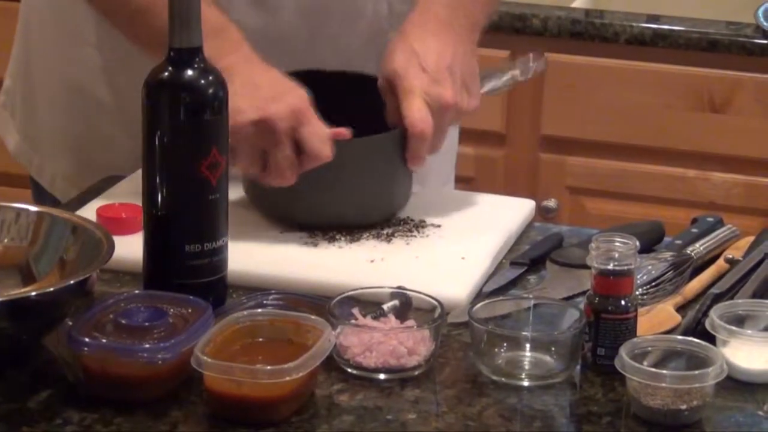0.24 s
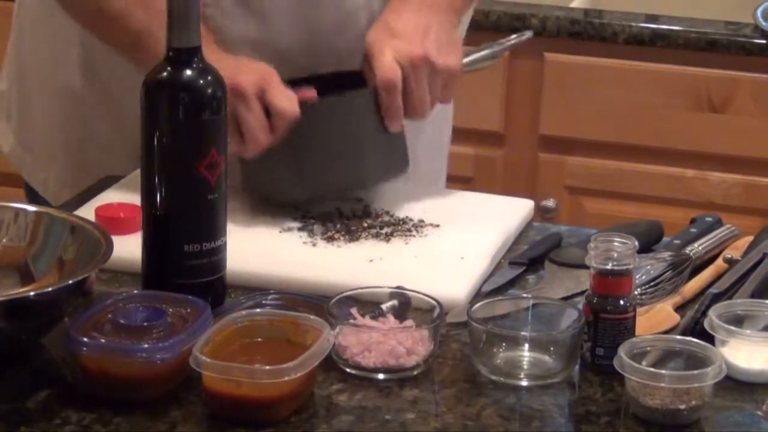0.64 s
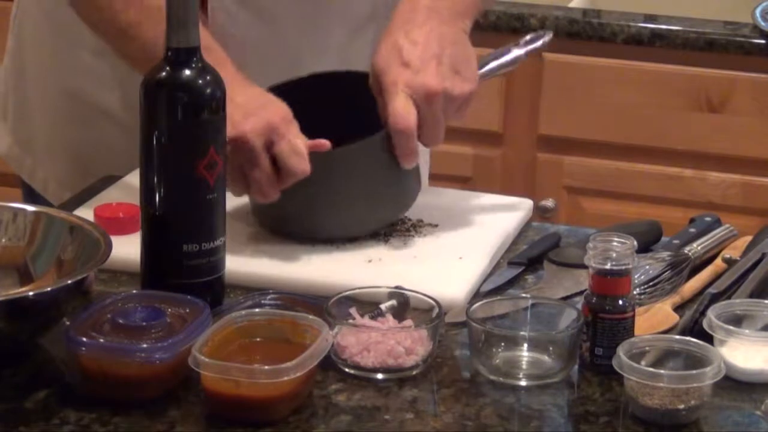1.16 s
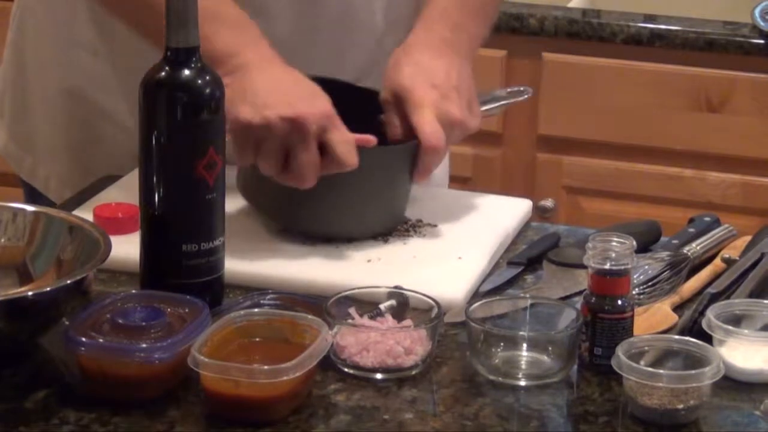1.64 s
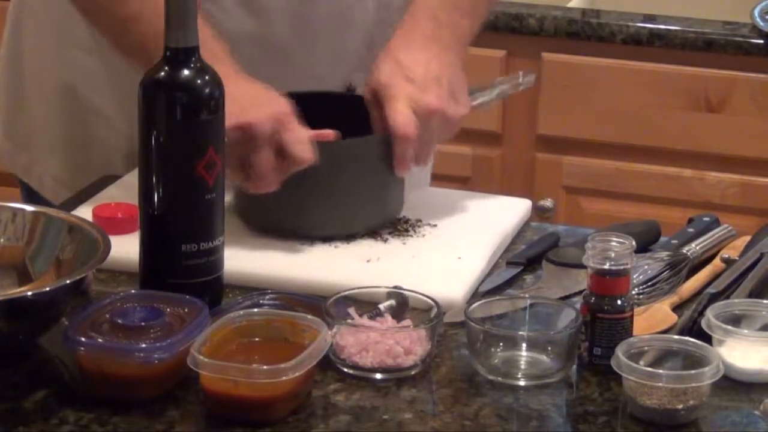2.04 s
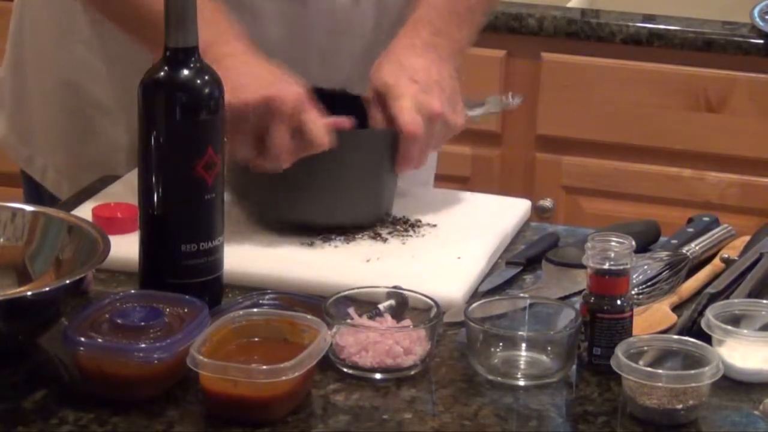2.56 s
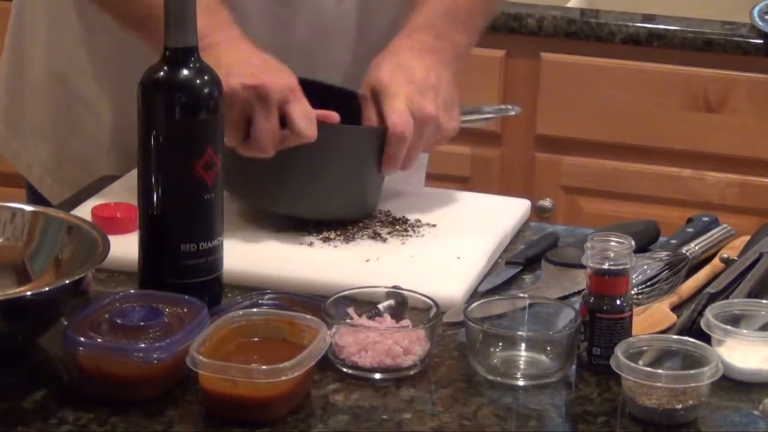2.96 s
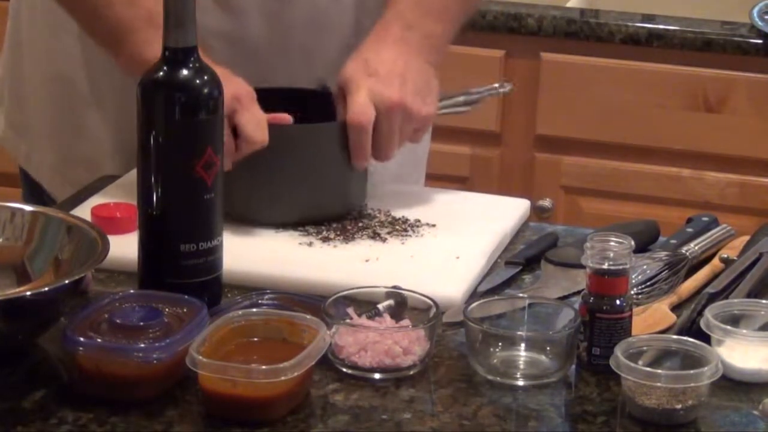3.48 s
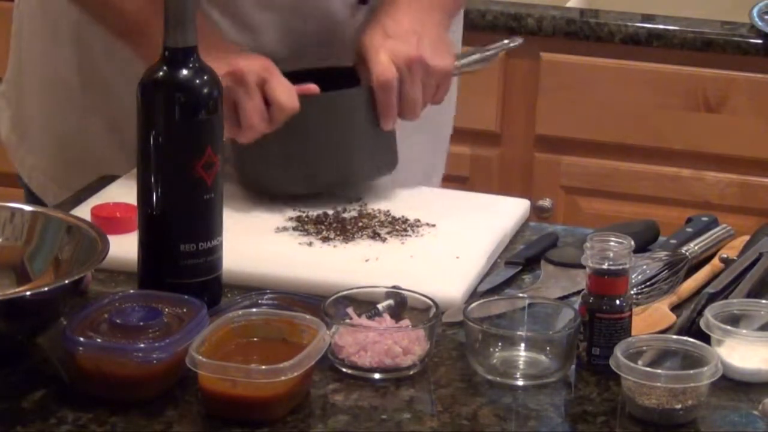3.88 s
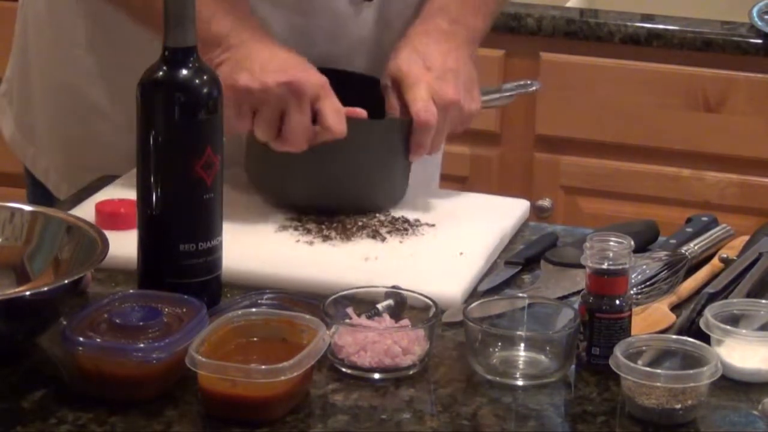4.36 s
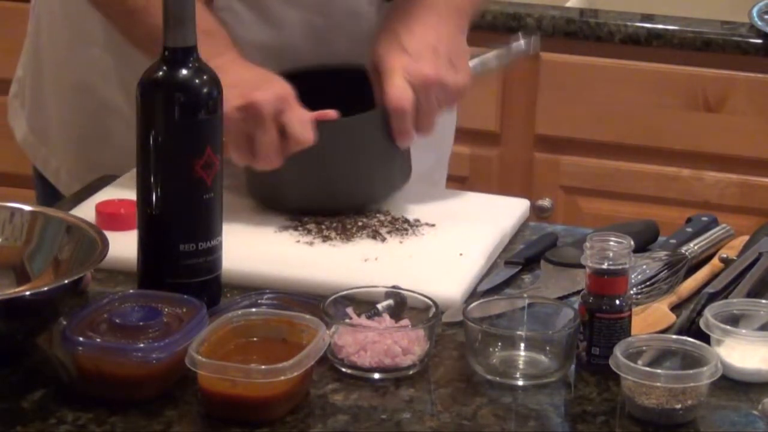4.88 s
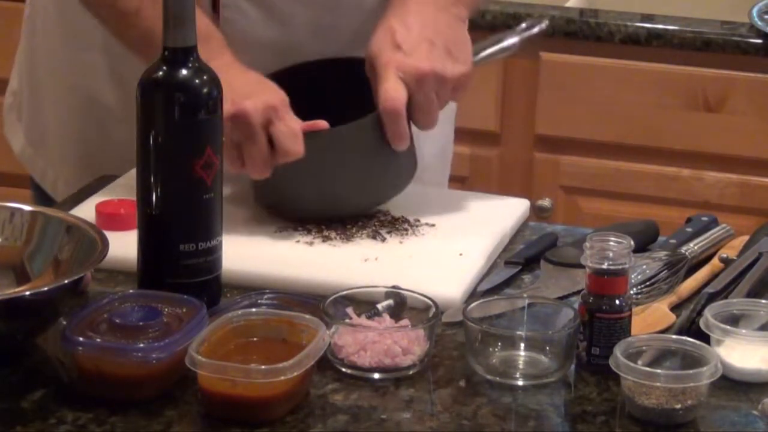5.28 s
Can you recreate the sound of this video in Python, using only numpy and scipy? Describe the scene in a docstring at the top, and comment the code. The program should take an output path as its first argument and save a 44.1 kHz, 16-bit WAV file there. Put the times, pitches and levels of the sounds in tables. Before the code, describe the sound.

Close by in a kitchen, a metal saucepan is pressed again and again onto peppercorns on a plastic cutting board. Dry cracks and gritty crunching come first, then a run of louder rattling knocks from the pan's base. After a short lull come more knocks, a tiny squeaking skid and a last crunch. Room air and a low appliance hum continue underneath.

```python
"""A live kitchen: peppercorns are crushed under a metal saucepan on a plastic cutting board.
Corns snap and crumble, ringing the pan, while fine grit grinds under the cook's weight.
The base rocks down on the board with dull, chattering knocks and skids once.
An appliance hums behind it all, and a limiter holds the loudest blows."""
import sys
import numpy as np
from scipy import signal
from scipy.fft import rfft, irfft, next_fast_len
from scipy.io import wavfile
from scipy.ndimage import uniform_filter1d, map_coordinates

SR = 44100
rng = np.random.default_rng(int(sys.argv[2]) if len(sys.argv) > 2 else 0)


def to_wav(sig):
    """Store sig (one row per channel, or 1-D mono) as 16-bit WAV at the path in sys.argv[1].

    Samples outside -1..1 are clipped; the rate is SR.
    """
    pcm = np.clip(np.atleast_2d(sig), -1, 1) * 32767
    pcm = np.round(pcm).astype(np.int16)
    wavfile.write(sys.argv[1], SR, pcm.T)  # frames by channels


N = 243240

# colour of the room air: (frequency [Hz], level [dB])
AIR_SPECTRUM = [(15, -64), (25, -5.5), (90, -4), (109, -28.5), (139, -1), (172, -2), (224, -5), (264, -5),
                (293, -4.5), (573, -14), (9270, -20), (13800, -29), (15000, -67)]
# appliance hum: (frequency [Hz], level [dB])
HUM_TONES = [(120, -49), (166.9, -43.5)]
# the kitchen's reverb tail: (frequency [Hz], time to fall 60 dB [s])
REVERB_TIMES = [(150, 0.52), (530, 0.52), (1400, 0.55), (3700, 0.49), (9700, 0.32), (15000, 0.19)]
# stereo width of the reverb: (frequency [Hz], side level [dB])
REVERB_WIDTH = [(100, -17), (500, -12.5), (4000, -8.5), (9000, -11)]
# saucepan resonances: (frequency [Hz], width [Hz], level [dB])
PAN_MODES = [(1170, 380, -1), (2184, 135, 3.5), (2422, 206, 1), (3580, 416, -1), (4340, 122, -0.5),
             (5190, 304, -0.5), (6093, 316, -1.5), (7382, 177, 1), (8980, 240, -0.5), (9830, 99, -0.5),
             (11250, 55, -2), (12370, 130, -9), (13800, 150, -15)]
# skid resonances: (frequency [Hz], width [Hz], level [dB])
SQUEAL_MODES = [(690, 43, -11), (1570, 260, 1), (1900, 100, -4), (2200, 360, 0)]
# cutting board resonances: (frequency [Hz], width [Hz], level [dB])
PLASTIC_MODES = [(500, 48, 3), (670, 10, 9), (794, 90, 6.5), (970, 19, -22), (1075, 18, 9), (1570, 320, 9)]
# colour of the board under the pan: (frequency [Hz], level [dB])
BOARD_SPECTRUM = [(60, -25), (200, -16), (370, -13), (480, -2), (700, -1), (1100, 1), (1700, -4.5),
                  (3500, -4.5), (6000, 8.5), (12500, 24), (14500, -26)]
# colour of a bursting husk: (frequency [Hz], level [dB])
HUSK_SPECTRUM = [(100, -17.5), (300, -17), (550, -6.5), (1200, -1.5), (1800, -2.5), (3000, -3.5),
                 (6500, -9), (12500, 0.5), (13700, -14), (16000, -4.5)]
# the cook bears down on the pan: (start [s], end [s], level [dB])
PRESS_CUES = [(0, 0.08, -24), (1.464, 1.874, -23), (2.238, 2.733, -31), (3.305, 3.52, -24),
              (4.282, 4.54, -24), (5.476, 5.52, -20.5)]
# the base skids over the plastic: (time [s], length [s], level [dB])
SKID_CUES = [(4.388, 0.039, -12)]
# the base meets the board: (time [s], level [dB], brightness [Hz], chatter length [s], thump [dB])
KNOCK_CUES = [(.002, -16, 1560, 0.017, -23), (0.5069, -7, 2800, 0.065, -9.5), (.883, -33, 1280, 0.017, -7),
              (1.128, -14.5, 1360, 0.012, -5), (1.193, -18, 1150, 0.0063, -1),
              (2.469, -7, 1000, 0.017, -16.5), (2.767, -7, 1530, 0.015, -33),
              (2.784, -3.5, 1450, 0.053, -29), (3.103, -25.5, 2000, 0.016, -25),
              (3.128, -3.5, 2200, 0.031, -17), (3.16, -7.5, 2080, 0.062, -14.5),
              (3.466, -7.5, 2320, 0.051, -10), (3.96, -14, 1170, .0025, -26),
              (4.223, -23.5, 1730, 0.071, -8), (4.303, -9, 890, 0.014, -3), (4.325, -6, 1810, 0.022, -18),
              (4.727, -23, 1900, 0.018, 9.5), (4.881, -5.5, 2580, 0.058, -13.5),
              (5.267, -24, 1900, 0.028, -5)]
# corns burst, big ones with more weight below 5 kHz:
# (time [s], level [dB], weight [dB], crumble length [s])
CRACK_CUES = [(.003, -18.5, 3, 0.045), (.0622, -14.5, -4.5, .005), (.1737, -12.5, -1, 0.006),
              (.2139, -6.5, -0.5, 0.083), (.3722, -20.5, 0, 0.032), (.4402, -14.5, -2, 0.0052),
              (.4979, -13, 17, 0.0046), (.579, -20, 14, .003), (1.1276, -26, -8, 0.0024),
              (1.288, -28, -4, 0.0027), (1.31, -27.5, 9, 0.063), (1.392, -14.5, -1.5, 0.0026),
              (1.4455, -11.5, 1.5, 0.044), (1.5281, -12.5, -5, .006), (1.543, -16.5, 8, 0.019),
              (1.6617, -23.5, -10, 0.04), (1.7119, -9.5, -4, 0.032), (1.8381, -13, 0.5, 0.027),
              (1.9722, -27.5, -5, 0.013), (2.091, -26.5, 4, 0.016), (2.1135, -21, 10, 0.027),
              (2.257, -26, 11, .003), (2.2713, -12, 4, 0.0019), (2.2839, -13.5, -1, 0.034),
              (2.437, -11.5, 7, 0.0035), (2.4515, -13.5, -0.5, 0.0055), (2.6084, -12, 7.5, .005),
              (2.724, -27.5, -9, 0.0033), (2.8926, -11, 7.5, 0.0062), (2.897, -16.5, 0, 0.0026),
              (3.1146, -25, 12, .003), (3.315, -8.5, 4, .06), (3.4366, -12, 3.5, 0.0051),
              (3.627, -25, 30, 0.0061), (4.261, -22.5, 4, .02), (4.2774, -11.5, 9, 0.012),
              (4.413, -25, 11, .004), (4.525, -25, 7, 0.044), (4.555, -27.5, -12, 0.0026),
              (4.727, -25, 14, 0.0033), (5.2685, -29.5, -7, 0.011), (5.464, -20.5, 2.5, 0.009),
              (5.475, -14, 1, 0.026)]

SIZE = 32768  # samples in each one-shot
T, HZ = np.arange(SIZE) / SR, np.fft.rfftfreq(SIZE, 1 / SR)


def amp(db):
    """Decibels to gain."""
    return 10 ** (np.asarray(db) / 20)


def unit_rms(x):
    """Scale to rms 1."""
    return x / np.sqrt(np.mean(x ** 2) + 1e-20)


def unit_energy(x):
    """Scale to energy 1."""
    return x / (np.linalg.norm(x) + 1e-20)


def curve(points, hz):
    """Join (frequency [Hz], value) points on a log frequency axis."""
    freqs, values = np.transpose(points)
    return np.interp(np.log(hz + 1), np.log(freqs + 1), values)


def stereo(mid, side):
    """Mid and side to left and right."""
    return np.array([mid + side, mid - side])


def equalise(track, gain_at):
    """EQ a whole track with a gain that depends on frequency."""
    padded = next_fast_len(N + 8192)
    return irfft(rfft(track, padded) * gain_at(np.fft.rfftfreq(padded, 1 / SR)), padded)[..., :N]


def resonances(modes):
    """Power response of ringing modes with steep skirts."""
    return sum(amp(db) ** 2 * np.abs(HZ * width / (centre ** 2 - HZ ** 2 + 1j * HZ * width)) ** 3
               for centre, width, db in modes)


def causal(gain):
    """The minimum-phase response with this gain: it rings only after the blow."""
    cepstrum = irfft(np.log(np.maximum(gain, 1e-6)))
    cepstrum[1:SIZE // 2] *= 2
    cepstrum[SIZE // 2 + 1:] = 0
    return np.exp(rfft(cepstrum))


def add(track, time, sound):
    """Mix in a stereo one-shot at a time in seconds."""
    start = max(0, round(time * SR))
    part = track[:, start:start + SIZE]
    part += sound[:, :part.shape[1]]


def grains(size, per_s, spread_db):
    """Sparse random clicks of uneven strength."""
    hits = rng.random(size) < per_s / SR
    return hits * rng.choice([-1, 1], size) * amp(spread_db * rng.standard_normal(size))


def stroke(length_s):
    """Pressure envelope: fast attack, hold, release."""
    return (1 - np.exp(-T / 0.0013)) / (1 + (T / max(length_s, 0.002)) ** 10)


def radiate(force, body, response):
    """A force drives a body through a room or EQ response; the loudest 5 ms have rms 1."""
    sound = irfft(rfft(force) * body * response)
    power = uniform_filter1d(np.mean(sound ** 2, axis=0), size=220)
    return sound / np.sqrt(power.max())


def kitchen(tail_db, early_t60_s=0.11):
    """Stereo room response: direct sound, close counter-top reflections and a diffuse tail."""
    hz, t, noise = signal.stft(rng.standard_normal((2, SIZE)), SR, nperseg=256)
    decay = amp(-60 * t / curve(REVERB_TIMES, hz)[:, None])
    tail = signal.istft(noise * decay, SR, nperseg=256)[1][:, :SIZE]
    tail *= 1 - np.exp(-T / 0.0019)
    early = rng.standard_normal((2, SIZE)) * amp(-60 * T / early_t60_s)
    mid, side = rfft(amp(tail_db) * tail / np.linalg.norm(tail[0]) + early / np.linalg.norm(early[0]))
    return stereo(1 + mid, side * causal(amp(curve(REVERB_WIDTH, HZ))))  # the 1 is the direct sound


def room_tone(air_db=-41, side_db=-13):
    """The bed: steady kitchen air and an appliance's slightly unsteady hum."""
    mid, side = unit_rms(equalise(rng.standard_normal((2, N)), lambda hz: amp(curve(AIR_SPECTRUM, hz))))
    t = np.arange(N) / SR
    drift = 0.14 * map_coordinates(rng.standard_normal(40), [t * 4])  # slow phase wander
    hum = sum(amp(db) * np.sqrt(2) * np.sin(2 * np.pi * hz * t + drift) for hz, db in HUM_TONES)
    return amp(air_db) * stereo(mid, amp(side_db) * side) + hum


def pan_colour(modes_db):
    """Husk spectrum with the pan's resonances standing out of it."""
    husk_power = amp(curve(HUSK_SPECTRUM, HZ)) ** 2
    return causal(np.sqrt(husk_power + amp(modes_db) ** 2 * resonances(PAN_MODES)))


def pressure_db(t, lean_db_per_s=81, ease_db_per_s=51):
    """The cook leans in, holds and eases off."""
    presses = [db - lean_db_per_s * np.maximum(start - t, 0) - ease_db_per_s * np.maximum(t - end, 0)
               for start, end, db in PRESS_CUES]
    return np.max(presses, axis=0)


def grit(pan, trim_db=-5):
    """Fine fragments grind under the rocking base, swelling with the pressure."""
    swell = amp(pressure_db(np.arange(N) / SR) + trim_db)
    force = unit_rms(grains(N, per_s=1100, spread_db=4)) * swell
    dark_eq = causal(amp(curve([(400, 17.5), (1200, 5), (3000, -11), (13000, -23)], HZ)))
    grain_ring = unit_energy(irfft(pan * dark_eq * kitchen(tail_db=-14)))
    return signal.fftconvolve(force[None], grain_ring, axes=1)[:, :N]


def skids():
    """Quick uneven slips set the base squealing."""
    out = np.zeros((2, N))
    squeal = causal(np.sqrt(resonances(SQUEAL_MODES) / (1 + (HZ / 3200) ** 4)))
    for time, length, db in SKID_CUES:
        slips = grains(SIZE, per_s=720, spread_db=1.5) * stroke(length)
        add(out, time, amp(db) * radiate(slips, squeal, kitchen(tail_db=-1.5)))
    return out


def collapses(half_power_s=0.0061):
    """Each burst starts a collapse, weaker when it is brief: (time [s], length [s], level [dB])."""
    return [(time, length, db - 10 * np.log10(1 + (half_power_s / max(length, 0.001)) ** 2))
            for time, db, _, length in CRACK_CUES]


def settlings(lag_s=0.013, trim_db=-10.5, bright_hz=1450, thump_db=-31):
    """The base sinks and chatters for as long as the corns crumble; rows like KNOCK_CUES."""
    return [(time + lag_s, db + trim_db, bright_hz, length, thump_db)
            for time, length, db in collapses()]


def knocks(trim_db=-1, chatter_db=-1, rasp_db=-13, rasp_hz=4000, thump_hz=132, thump_width_hz=70):
    """The base lands and chatters on the board; grit between them softens the hit and adds a rasp."""
    out = np.zeros((2, N))
    modes = resonances(PLASTIC_MODES) + resonances(PAN_MODES)
    board = amp(curve(BOARD_SPECTRUM, HZ)) * np.sqrt(amp(12) + modes)
    for time, db, bright_hz, chatter_s, thump_db in KNOCK_CUES + settlings():
        soft_contact = 1 / np.sqrt(1 + (HZ / bright_hz) ** 9)
        rasp = amp(rasp_db) * (bright_hz / 2000) ** 1.66 / (1 + (HZ / rasp_hz) ** 7)
        thump = resonances([(thump_hz, thump_width_hz, thump_db + 9)])  # the counter gives underneath
        body = causal(np.sqrt((board * (soft_contact + rasp)) ** 2 + thump))
        chatter = unit_energy(grains(SIZE, per_s=1400, spread_db=3) * stroke(chatter_s))
        force = (T == 0) + amp(chatter_db) * np.sqrt(chatter_s / 0.0044) * chatter
        room = kitchen(tail_db=0, early_t60_s=0.06)
        add(out, time, amp(db + trim_db) * radiate(force, body, room))
    return out


def crunches(pan, lag_s=0.007, trim_db=-4.5):
    """A burst corn's neighbours give way just after it, in a duller run of small fractures."""
    out = np.zeros((2, N))
    muffled = pan * causal(amp(curve([(2500, -0.5), (5000, -2.5), (13000, -7.5)], HZ)))
    for time, length, db in collapses():
        fractures = grains(SIZE, per_s=1000, spread_db=3.5) * stroke(length)
        add(out, time + lag_s, amp(db + trim_db) * radiate(fractures, muffled, kitchen(tail_db=-0.5)))
    return out


def chips(per_s=9, trim_db=-6, spread_db=1, weight_db=-4, gate_db=-42):
    """Small pieces snap at random, louder under pressure: (time [s], level [dB], weight [dB])."""
    time_jitter, level_jitter = rng.random((80, 2)).T
    times = (np.arange(80) + time_jitter) / per_s
    levels = pressure_db(times) + trim_db + spread_db * (2 * level_jitter - 1)
    return [(time, db, weight_db) for time, db in zip(times, levels) if time < N / SR and db > gate_db]


def cracks(pan, ring_db=-4, gentle_db=-29, crumble_db=-3, crumble_s=0.019, side_db=-15):
    """Each husk snaps in a dry, broad burst; the burst and the breaking pieces ring the pan."""
    out = np.zeros((2, N))
    burst = np.exp(-(T / 0.005) ** 2)
    husk = pan_colour(modes_db=-2)
    for time, db, weight_db, *_ in CRACK_CUES + chips():
        weight = causal(amp(weight_db / (1 + (HZ / 5000) ** 4)))
        mid, side = rng.standard_normal((2, SIZE)) * burst
        snap = radiate(stereo(mid, amp(side_db) * side), husk, weight)
        pieces = unit_energy(grains(SIZE, per_s=1600, spread_db=6) * np.exp(-T / crumble_s))
        force = unit_energy(mid) + amp(crumble_db) * pieces
        ring = radiate(force, pan * weight, kitchen(tail_db=4.5))
        sharpness = 1 / (1 + amp(gentle_db - db))  # faint cracks are mostly ring
        add(out, time, amp(db) * (sharpness * snap + amp(ring_db) * ring))
    return out


def scene():
    """The crushing sits slightly left of centre, over the room tone."""
    pan = pan_colour(modes_db=8.5)
    crushing = cracks(pan) + crunches(pan) + knocks() + skids() + grit(pan)
    return crushing * amp([[0.5], [-0.5]]) + room_tone()


def record(dry, ceiling=0.64, release_db_per_s=60, top_hz=15700):
    """A limiter ducks on the 2 ms level and releases steadily; then a soft clip and a high cut."""
    level = np.sqrt(np.abs(uniform_filter1d(np.mean(dry ** 2, axis=0), size=88)))
    over_db = 20 * np.log10(np.maximum(level / ceiling, 1))
    release_ramp = release_db_per_s * np.arange(N) / SR
    duck_db = np.maximum.accumulate(over_db + release_ramp) - release_ramp
    held = dry * amp(-duck_db)
    rounded = held / (1 + held ** 8) ** (1 / 8)
    return equalise(rounded, lambda hz: np.clip((top_hz - hz) / 900 + 0.5, 0, 1))


dry = scene()
out = record(dry)
to_wav(out)
```